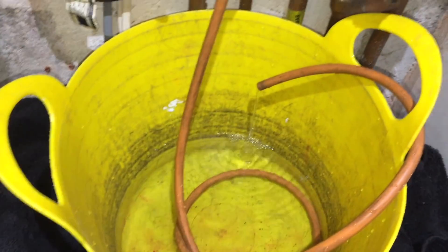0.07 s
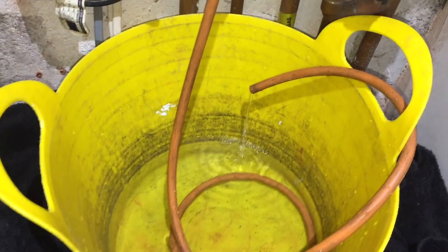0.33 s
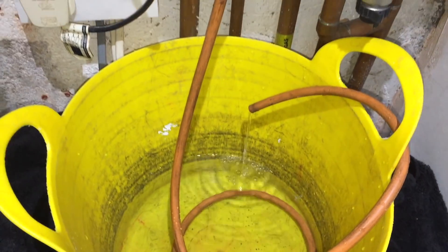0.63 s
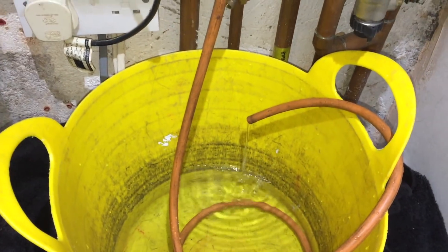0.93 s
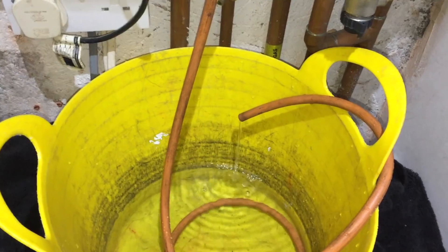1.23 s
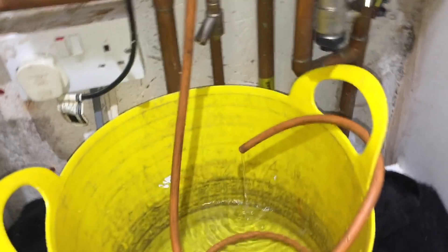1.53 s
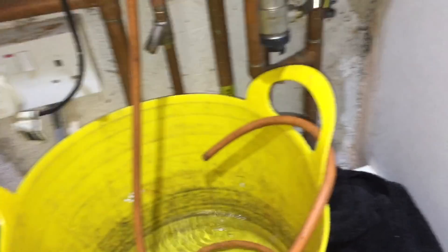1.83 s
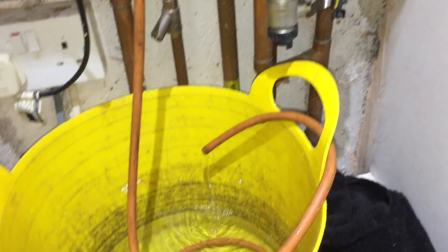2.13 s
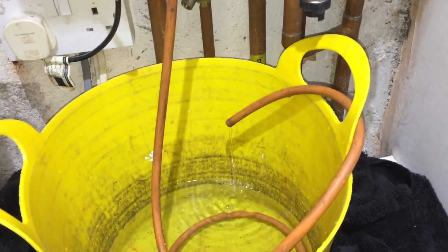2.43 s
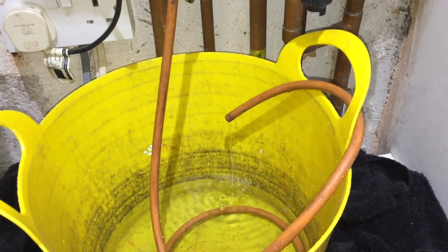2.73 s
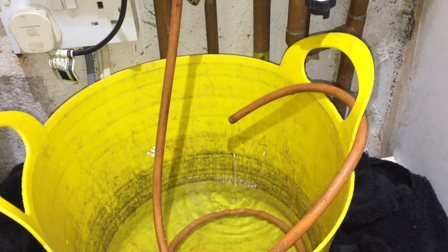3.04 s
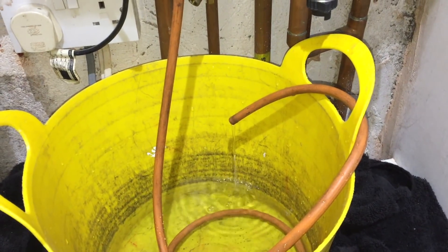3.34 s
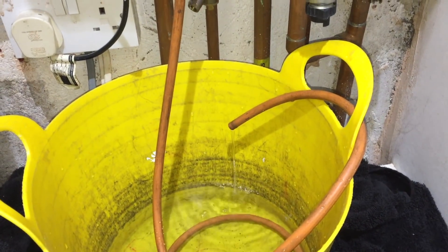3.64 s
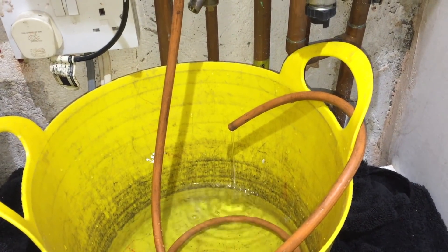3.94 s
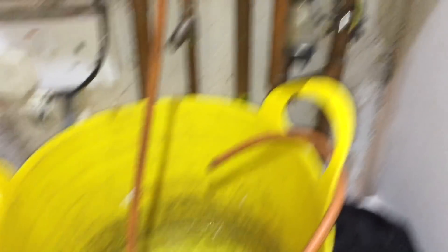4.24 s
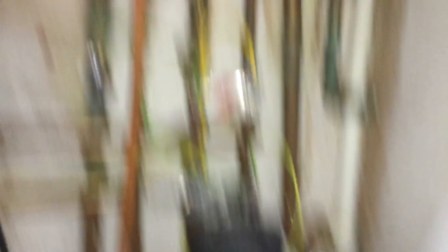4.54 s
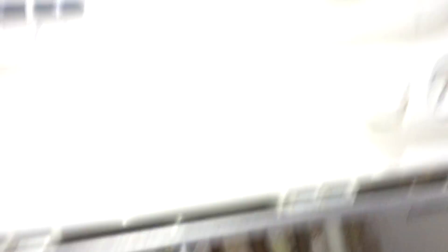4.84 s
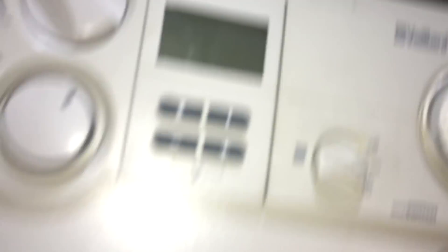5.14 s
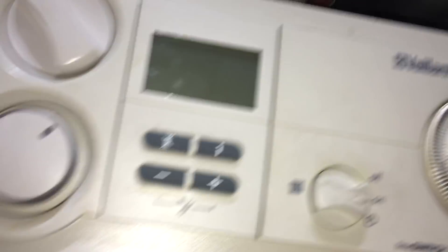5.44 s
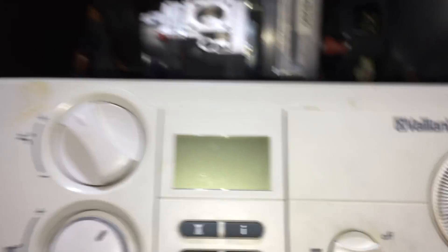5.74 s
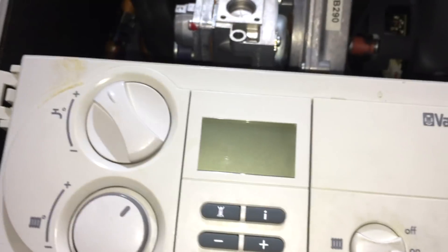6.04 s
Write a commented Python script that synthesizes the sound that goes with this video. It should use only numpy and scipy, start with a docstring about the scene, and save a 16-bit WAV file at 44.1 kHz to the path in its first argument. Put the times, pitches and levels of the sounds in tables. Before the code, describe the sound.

A thin trickle patters into water in a plastic tub, followed by light bumps and a sharp knock on a boiler panel.

```python
"""Drops plink into water in a plastic tub, close to the microphone, as the thin stream from a boiler's
drain hose breaks up. Each drop slaps the surface, punches a hollow that plops and traps ringing bubbles.
The place is a small room with a faint mains hum. The hand-held microphone is lifted away with some
rustling, the trickle fades behind the boiler, and the boiler's plastic control panel is bumped and
then knocks sharply."""
import sys
import numpy as np
from scipy import signal
from scipy.fft import rfft, irfft, next_fast_len
from scipy.io import wavfile
from scipy.ndimage import map_coordinates

SR = 44100
rng = np.random.default_rng(int(sys.argv[2]) if len(sys.argv) > 2 else 0)


def transcribe(signal):
    """Save signal, clipped to [-1, 1], as a 16-bit WAV file at the path in sys.argv[1]."""
    frames = np.atleast_2d(signal).T
    limited = np.clip(frames, -1, 1)
    pcm = np.round(limited * 32767).astype(np.int16)
    wavfile.write(sys.argv[1], SR, pcm)


N = 276948

# Levels in the tables are relative; each source adds its own gain.
# room tone: (frequency [Hz], level [dB])
AIR_SPECTRUM = [(18, -42.5), (30, -12.5), (45, 3), (100, 8), (150, -15), (210, -7), (295, 6), (420, -14.5),
                (520, -12.5), (800, -10), (1400, -17), (3000, -19.5), (6000, -21.5), (16000, -31)]
# partials of the mains hum: (frequency [Hz], level [dB])
HUM_PARTIALS = [(49.6, -65.5), (99.6, -68.5), (300.5, -73.5)]
# reverberation of the small room: (frequency [Hz], t60 [s])
ROOM_DECAY = [(150, 0.42), (1000, 0.24), (3000, 0.2), (8000, 0.18), (15000, 0.087)]
# close reflections, as inside the tub: (frequency [Hz], t60 [s])
TUB_DECAY = [(200, 0.12), (1200, 0.052), (4000, 0.018), (12000, 0.028)]
# faint tones under the trickle: (time [s], pitch [Hz], level [dB])
SOFT_TONES = [(1.555, 676, -59.5), (2.35, 720, -62)]
# a sleeve rubbing at the microphone: (frequency [Hz], level [dB])
SLEEVE_SPECTRUM = [(71, -48), (120, -13.5), (275, -1), (350, -2.5), (961, -8), (1630, -7), (5040, -23),
                   (5800, -15.5), (7860, -44.5), (15000, -29.5)]
# strokes of hand and sleeve: (time [s], length [s], level [dB])
SLEEVE_STROKES = [(0.0, 0.12, -50.5), (2.15, 0.13, -46), (4.785, 0.09, -51.5), (4.91, 0.086, -48.5),
                  (5.29, 0.058, -49), (5.55, 0.13, -56), (5.811, 0.038, -51), (6.09, 0.028, -68)]
# the hand jolts the microphone: (time [s], level [dB])
HAND_JOLTS = [(0.0, -31.5), (0.56, -50), (1.74, -42), (2.18, -44), (2.3, -44), (4.4, -43), (4.68, -51),
              (4.87, -41), (4.98, -44), (5.14, -42), (5.355, -29.5)]
# rumble of a jolt: (frequency [Hz], level [dB])
JOLT_SPECTRUM = [(20, -16), (45, -8.0), (70, 10.0), (120, -7), (220, -26.0), (600, -65.5)]
# small pitched ticks: (time [s], pitch [Hz], level [dB])
PITCHED_TICKS = [(4.622, 2010, -39.5), (4.644, 2980, -26.5), (4.959, 3410, -31.5), (5.013, 2300, -38),
                 (5.213, 3560, -30.5), (5.264, 4630, -35.5), (5.287, 2370, -40), (5.433, 2310, -44),
                 (5.642, 2450, -42.5), (5.667, 5310, -39), (5.697, 5300, -44.5), (5.819, 2450, -37),
                 (5.841, 5810, -38.5), (5.858, 990, -42)]
# blows on the panel and casing: (time [s], crack [dB], body [dB], brightness [dB/octave])
PANEL_KNOCKS = [(4.641, -33.5, -58, -6), (4.751, -42.5, -35, -3), (4.851, -38, -35, -2.5),
                (5.1256, -30.5, -14, -7), (5.143, -22.5, -8.5, -5.5), (5.211, -39.5, -32, -6),
                (5.263, -38, -35.5, 3.5), (5.302, -40, -17.5, -5.5), (5.368, -42.5, -17, -3),
                (5.5076, -4, -0.5, 0), (5.666, -40, -22.5, -11.5), (5.698, -70.5, -24.5, -9),
                (5.841, -42, -37, -7), (6.155, -48, -46.5, -18.5)]
# contact noise on the plastic: (frequency [Hz], level [dB])
CRACK_SPECTRUM = [(120, -25), (200, -4), (400, -7), (800, -4), (1180, -3), (1500, 2.5), (2090, 5.5),
                  (2850, -1), (3900, -1), (5000, -8), (6400, 1), (8250, -9.5), (8900, -6.5), (16000, -11.5)]
# resonances of the panel and casing: (frequency [Hz], level [dB], t60 [s])
PANEL_MODES = [(170.7, -1.5, .24), (208, -3, 0.16), (246, -4.5, 0.25), (326, -1, 0.12), (400, -11.5, 0.14),
               (553, -8, .12), (608, -9.5, 0.086), (675, -11, 0.1), (854, -16.5, 0.12), (1181, -4.5, 0.18),
               (1780, 8, 0.015), (1970, 3.5, 0.025), (2760, 13.5, .04), (3100, 0.5, 0.099),
               (3870, 14, 0.044), (6840, 7.5, 0.025), (7030, -1.5, 0.067), (8230, 18.5, 0.015)]
# response of the tub's side: (frequency [Hz], level [dB])
WALL_SPECTRUM = [(100, -28), (160, -32), (215, -5.5), (300, 19), (420, 11), (560, -11.5), (750, -24),
                 (950, -12.5), (1300, 0.5), (2200, -23.5), (5000, -70)]
# the trickle as heard from the microphone's position: (time [s], minor bubbles [dB], spatter [dB])
TRICKLE_LEVELS = [(0, -57, -53), (.7, -52, -42), (1.498, -54, -45), (2.1, -50, -48), (2.6, -48, -52.5),
                  (3.1, -55, -53.5), (3.8, -62.5, -43.5), (4.4, -47.5, -58), (4.8, -46, -61),
                  (5.3, -52, -60), (5.699, -68.5, -70.5), (6.28, -68.5, -79)]
# a drop's impact on the surface: (frequency [Hz], level [dB])
SLAP_SPECTRUM = [(100, -67), (300, -2.5), (600, -50), (1200, -26.5), (3000, 7), (5000, -4.5), (8000, -6.5),
                 (12000, -8), (16000, -10)]
# collapse of the hollow: (frequency [Hz], level [dB])
PLOP_SPECTRUM = [(120, -48), (220, 9.5), (400, 4), (560, 7), (800, -19.5), (1100, 3.5), (1800, 17),
                 (3000, -6), (6000, -37), (14000, -40)]
# fizz of churned water: (frequency [Hz], level [dB])
FIZZ_SPECTRUM = [(500, -46), (1100, -6), (2000, -16), (3500, 32), (5000, -18), (9000, -39), (16000, -43)]
# drops landing in the tub: (time [s], small bubble [dB], its pitch [Hz],
# large bubble [dB], its pitch [Hz], slap [dB], plop [dB])
DROPS = [(0.0157, -30.5, 2260, -35.5, 1615, -49.5, -68), (0.0356, -38.5, 2530, -46, 1350, -41.5, -57),
         (0.0826, -40, 2270, -38.5, 1640, -74, -51), (0.1241, -35.5, 2340, -39.5, 1380, -62, -54),
         (0.1717, -42, 3360, -41.5, 1710, -61, -62), (0.1983, -31, 7400, -72, 1280, -70, -70),
         (0.225, -38.5, 2370, -45, 1170, -66, -45.5), (0.2476, -30.5, 7030, -46, 867, -73, -59),
         (0.2959, -37, 3130, -38, 1350, -44.5, -65), (0.3511, -31.5, 3140, -38.5, 1300, -53, -47),
         (0.4466, -25, 2500, -44.5, 1660, -32, -54), (0.4782, -19, 3480, -48, 905, -42, -70),
         (0.5348, -35.5, 2300, -40, 1185, -45, -62), (0.6063, -26.5, 6730, -40.5, 1750, -34.5, -46),
         (0.6907, -23.5, 4220, -35, 1127, -27, -45.5), (0.734, -28.5, 5600, -48.5, 939, -63, -70),
         (0.7737, -28, 3470, -56, 2050, -66, -72), (0.7966, -30.5, 5700, -42.5, 1640, -48, -61),
         (0.8216, -30.5, 3410, -68, 1650, -45, -71), (0.8622, -32, 5840, -44, 1490, -66, -65),
         (0.8764, -44, 2330, -35, 1247, -60, -48), (0.9431, -30.5, 6300, -44, 1670, -41.5, -69),
         (0.961, -48, 5650, -38, 1110, -52, -60), (1.0241, -26, 2230, -30.5, 2030, -27.5, -58),
         (1.0434, -31, 2400, -31.5, 1300, -40, -54), (1.1086, -26.5, 3700, -42, 1440, -36, -59),
         (1.123, -35, 3900, -39.5, 1150, -59, -45.5), (1.1898, -30.5, 2370, -44, 2150, -37, -53),
         (1.264, -44, 3160, -38.5, 1250, -38, -47), (1.302, -32.5, 3390, -44.5, 1095, -67, -48.5),
         (1.3859, -36, 3140, -42, 1980, -67, -50), (1.413, -25, 4700, -65, 1180, -72, -70),
         (1.4673, -42, 5650, -44, 1130, -49, -51), (1.4782, -25.5, 4440, -45, 1030, -38, -61),
         (1.4948, -50, 3580, -32.5, 1164, -35.5, -43.5), (1.5407, -35, 3670, -44, 1160, -37.5, -45),
         (1.6029, -33, 4190, -47, 1980, -70, -57), (1.6414, -40, 2080, -44, 1340, -54, -69),
         (1.7147, -51, 7300, -61, 1830, -37.5, -63), (1.721, -32, 5570, -44, 1440, -37, -60),
         (1.7673, -25.5, 3020, -24, 1424, -42, -45), (1.8323, -29.5, 6540, -36.5, 1165, -68, -53.5),
         (1.891, -36, 3750, -64, 1850, -34.5, -50.5), (1.9635, -40, 2860, -41.5, 1166, -50, -64),
         (1.9821, -30, 6900, -41.5, 1100, -35, -49), (2.0213, -42, 2930, -44.5, 1160, -58, -71),
         (2.0449, -57, 3590, -42, 1090, -71, -63), (2.0776, -32.5, 3780, -39.5, 1230, -66, -59),
         (2.1019, -40, 2730, -45, 1130, -43, -62), (2.2359, -32, 2930, -39.5, 1530, -46, -43),
         (2.3421, -33, 2920, -44.5, 1260, -74, -72), (2.3758, -35, 2310, -38.5, 1640, -66, -71),
         (2.4092, -34, 3200, -35.5, 1380, -66, -58), (2.4799, -29, 3080, -45, 1290, -50, -48),
         (2.5602, -31, 3920, -48, 1130, -48, -49), (2.5741, -43, 2360, -38.5, 1046, -50, -47),
         (2.5956, -31, 6200, -52, 1070, -35.5, -67), (2.6255, -33, 2830, -45, 1630, -36, -72),
         (2.661, -28, 3080, -54.5, 1150, -54, -67), (2.6846, -52, 3260, -39, 1390, -50.5, -67),
         (2.7238, -27.5, 2930, -36, 1300, -58, -68), (2.7476, -35, 2740, -38, 1605, -59, -69),
         (2.7765, -24, 2840, -34.5, 2113, -37, -48), (2.8062, -29.5, 4070, -41, 1200, -46, -64),
         (2.835, -28, 3050, -67, 1220, -39, -66), (2.8645, -32.5, 6140, -36.5, 1115, -41.5, -41.5),
         (2.9316, -40, 2740, -45.5, 1660, -39, -71), (2.9917, -30, 2410, -37.5, 1640, -42, -57),
         (3.0066, -37.5, 2500, -37.5, 1400, -65, -62), (3.0599, -17.5, 3680, -55, 1390, -50, -72),
         (3.1133, -34, 6200, -72, 1430, -42, -60), (3.1674, -29, 3050, -45, 2210, -33.5, -66),
         (3.1891, -28, 4070, -52, 1800, -71, -69), (3.2095, -36.5, 4790, -69, 1910, -48, -79),
         (3.2623, -59, 2770, -43.5, 1010, -68, -45.5), (3.3351, -36.5, 2830, -35.5, 1200, -55, -46),
         (3.3595, -15.5, 3310, -38.5, 1220, -33.5, -69), (3.3888, -20.5, 3030, -30.5, 1510, -35, -67),
         (3.4433, -48, 3590, -42, 1610, -63, -52), (3.4658, -37.5, 5900, -29, 1420, -72, -65),
         (3.5365, -35, 2890, -42, 1306, -47, -54), (3.5924, -40, 8300, -42.5, 1660, -57, -62),
         (3.62, -42, 2390, -39, 1410, -67, -71), (3.638, -30.5, 2410, -44, 1450, -64, -82),
         (3.7174, -50, 2800, -38, 1450, -47, -66), (3.8042, -36, 5760, -59, 958, -66, -74),
         (3.866, -40, 2780, -45.5, 1690, -55, -56), (3.8896, -19.5, 2950, -28, 2300, -31.5, -64),
         (3.924, -29, 3850, -47, 1620, -52, -71), (3.9904, -41.5, 7260, -38.5, 1165, -46.5, -53),
         (4.0491, -50, 4500, -41.5, 1300, -71, -48), (4.0712, -34.5, 2780, -49, 1590, -77, -56),
         (4.142, -49, 2680, -41.5, 1180, -61, -54), (4.2256, -37, 3510, -39, 1520, -35.5, -55),
         (4.3024, -18.5, 3270, -50, 1400, -73, -72), (4.3268, -25, 3130, -46, 1430, -81, -67),
         (4.34, -32, 3260, -34.5, 1300, -75, -56), (4.4224, -37, 2860, -35.5, 1146, -78, -50),
         (4.4464, -28, 3120, -48, 1060, -60, -70), (4.4627, -40, 2680, -33, 1310, -52, -66),
         (4.5293, -36, 3270, -62, 1670, -69, -78), (4.5988, -38, 2450, -59, 1600, -54, -74)]

SMALL_DB, LARGE_DB, SLAP_DB, PLOP_DB = -1.5, 5.5, 11, 7.5  # gain of each part of a drop
SMALL_CYCLES, LARGE_CYCLES = 9.2, 8.9  # nominal life of its bubbles
SMALL_RISE, LARGE_RISE, RISE_SCATTER = .15, .077, .32  # share they climb in pitch, and its spread
PINCH_DB, PINCH_T60_S = -14.5, .014  # crackle as a bubble pinches off
SHED_DB, SHED_S, SHED_RATIO = -12, .011, 1.17  # shed bubble: level, typical delay and pitch ratio


def amp(db):
    """Decibels to amplitude."""
    return 10 ** (np.asarray(db) / 20)


def unit(x):
    """x scaled to rms 1."""
    return x / np.sqrt(np.mean(x ** 2) + 1e-20)


def along(points, hz):
    """Interpolate (frequency, value) points on a log axis."""
    freqs, values = np.transpose(points)
    return np.interp(np.log(hz + 1), np.log(freqs + 1), values)


def wobble(rate):
    """A smooth random curve, rate knots a second."""
    coarse = np.arange(0, N + 32, 32)
    knots = rng.standard_normal(int(N * rate / SR) + 4)
    return np.interp(np.arange(N), coarse, map_coordinates(knots, [coarse * rate / SR]))


def filtered(x, response):
    """x through a frequency response."""
    size = next_fast_len(len(x) + min(len(x), 8192))
    return irfft(rfft(x, size) * response(np.fft.rfftfreq(size, 1 / SR)), size)[:len(x)]


def noise(spectrum, size, tilt_db=0):
    """Coloured noise of rms 1, tilted by tilt_db per octave above 1 kHz."""
    def response(hz):
        return amp(along(spectrum, hz) + tilt_db * np.log2(np.maximum(hz, 1000) / 3000))
    return unit(filtered(rng.standard_normal(size), response))


def add(track, s, sound):
    """Mix a sound into the track at time s."""
    start = int(np.clip(round(s * SR), 0, N))
    track[start:start + len(sound)] += sound[:N - start]


def burst(t, db, rise_s, t60_s):
    """An envelope that rises quickly and dies away exponentially."""
    return amp(db - 60 * t / t60_s) * (1 - np.exp(-t / rise_s))


def ping(hz, cycles, rise):
    """A bubble or tick rings for milliseconds, dying ever faster; its pitch climbs by the share rise."""
    life = .004 * np.tanh(cycles / hz / .004)
    t = np.arange(int(4 * life * SR)) / SR
    age = t / life
    phase = 2 * np.pi * np.cumsum(hz * (1 + rise * np.tanh(age / 1.5))) / SR
    fade = np.exp(-age / 2 - (age / 1.7) ** 2)
    return np.sin(phase) * fade * (1 - np.exp(-t * hz))


def room_tone():
    """Still room air and a faint, slightly unsteady mains hum."""
    t = np.arange(N) / SR
    hum = sum(np.sqrt(2) * amp(db + wobble(1.4)) * np.sin(2 * np.pi * hz * t + .16 * wobble(.67))
              for hz, db in HUM_PARTIALS)
    return hum + amp(-66.5) * noise(AIR_SPECTRUM, N)


def tail(decays, size):
    """A diffuse echo of energy 1 in which each frequency dies at its own speed."""
    hz, t, spectrum = signal.stft(rng.standard_normal(size), SR, nperseg=256)
    echo = signal.istft(spectrum * amp(-60 * t / along(decays, hz)[:, None]), SR, nperseg=256)[1]
    echo *= 1 - np.exp(-np.arange(len(echo)) / SR / .0011)
    return echo / np.linalg.norm(echo)


def echoes(x, decays, delay_s, size, stretches):
    """Reflections change as the microphone moves: each stretch of time gets a new tail."""
    out = np.zeros(N)
    for part in np.array_split(np.arange(N), stretches):
        add(out, part[0] / SR + delay_s, signal.fftconvolve(x[part], tail(decays, size)))
    return out


def soft_tones():
    """Two faint tones swell and fade in the background."""
    out, t = np.zeros(N), np.arange(SR // 3) / SR
    age = t / .038
    for s, hz, db in SOFT_TONES:
        add(out, s, amp(db) * age * np.exp(1 - age) * np.sin(2 * np.pi * hz * t))
    return out


def sleeve_rustle(count=260, grip_db=-70, attack_s=.015, release_s=.025):
    """Right at the microphone, a sleeve rubs in quick slips; some catch with a small tick."""
    slips = unit(amp(2.8 * wobble(240)) * noise(SLEEVE_SPECTRUM, N))
    catches = np.zeros(N)
    for (when, pitch), size in zip(rng.random((count, 2)), rng.standard_normal(count)):
        add(catches, when * N / SR, amp(3 * size) * ping(1000 * 5 ** pitch, cycles=8, rise=0))
    pressure, t = np.full(N, amp(grip_db)), np.arange(SR) / SR
    for s, length, db in SLEEVE_STROKES:
        release = np.exp(-np.maximum(t - length, 0) / release_s)
        add(pressure, s, amp(db) * np.minimum(t / attack_s, 1) * release)
    return pressure * (amp(-6.5) * slips + amp(-13.5) * unit(catches))


def hand_jolts():
    """Each jolt of the hand reaches the microphone as a low rumble."""
    shake, t = np.zeros(N), np.arange(SR) / SR
    for s, db in HAND_JOLTS:
        add(shake, s, burst(t, db, rise_s=.007, t60_s=.3))
    return amp(-10.5) * shake * noise(JOLT_SPECTRUM, N)


def pitched_ticks():
    """Small pitched ticks, probably far drips behind the boiler, ring briefly with short reflections."""
    out = np.zeros(N)
    for s, hz, db in PITCHED_TICKS:
        add(out, s, amp(db - 3.5) * ping(hz, cycles=5.4, rise=0))
    return out + amp(-1.5) * echoes(out, TUB_DECAY, delay_s=.0027, size=8192, stretches=8)


def panel_knocks():
    """A blow cracks on the boiler's plastic panel and rings the casing."""
    out, t = np.zeros(N), np.arange(SR // 2) / SR
    contact = amp(-9.5 - 60 * np.maximum(t - .002, 0) / .033) + amp(-18.5 - 60 * t / .098)
    contact *= 1 - np.exp(-(t / .0011) ** 2)
    for s, crack_db, body_db, tilt_db in PANEL_KNOCKS:
        crack = contact * noise(CRACK_SPECTRUM, len(t), tilt_db)
        ring = np.zeros(len(t))
        for hz, db, t60 in PANEL_MODES:
            blow_db = body_db if hz < 1000 else crack_db + tilt_db * np.log2(hz / 2000)
            onset = 1 - np.exp(-(t / max(1 / hz, .0012)) ** 2)
            swing = onset * np.sin(2 * np.pi * (hz * t + rng.random()))
            ring += amp(blow_db + db + rng.normal() - 60 * t / t60) * swing
        add(out, s, amp(crack_db) * crack + amp(-26) * ring)
    return out


def tub_wall(water, smoothing_s=.012):
    """The splashes nudge the soft plastic wall, which answers with a dull patter."""
    push = signal.lfilter([1], [1, -np.exp(-1 / (smoothing_s * SR))], np.abs(water))
    return amp(-66.5) * unit(push ** .7) * noise(WALL_SPECTRUM, N)


def spatter(count=210):
    """Stray droplets tick faintly on the water, each around a high pitch of its own."""
    out, t = np.zeros(N), np.arange(SR // 100) / SR
    times, _, level_db = np.transpose(TRICKLE_LEVELS)
    for (when, pitch), size in zip(rng.random((count, 2)), np.clip(rng.standard_normal(count), -2, 2)):
        s, hz = when * DROPS[-1][0], 5500 * 2.4 ** pitch
        tick = unit(filtered(noise(SLAP_SPECTRUM, len(t)), lambda f: 1 / np.hypot(1, (f - hz) / 1200)))
        db = np.interp(s, times, level_db) - 4.3 + 5.4 * size
        add(out, s, amp(db - 60 * t / .012) * tick)
    return out


def minor_bubbles(count=1100, wake_share=.65, mean_lag_s=.022):
    """Faint bubbles ring after the drops or at any time, fading as the microphone leaves the tub."""
    out = np.zeros(N)
    times, level_db, _ = np.transpose(TRICKLE_LEVELS)
    chances, spreads = rng.random((count, 4)), np.clip(rng.standard_normal((count, 2)), -2, 2)
    for (pick, kind, lag, pitch), (size, life) in zip(chances, spreads):
        if kind < wake_share:
            s = DROPS[int(pick * len(DROPS))][0] - mean_lag_s * np.log(1 - lag)
        else:
            s = pick * (N - 1) / SR
        hz = 1050 * 4.1 ** pitch
        cycles = 10.5 * np.sqrt(hz / 2000) * np.exp(.58 * life)
        db = np.interp(s, times, level_db) - 1 + 3 * size
        add(out, s, amp(db) * ping(hz, cycles, rise=.087))
    return out


def plops(collapse_lag_s=.002996):
    """A drop's hollow collapses with a short, dull splash, and the churned water fizzes for a moment."""
    out, t = np.zeros(N), np.arange(SR // 12) / SR
    fizz = burst(t, -23.5, rise_s=.0029, t60_s=.022)
    for s, small_db, _, large_db, _, _, db in DROPS:
        collapse = burst(t, db + PLOP_DB, rise_s=.0025, t60_s=.038)
        add(out, s + collapse_lag_s, collapse * noise(PLOP_SPECTRUM, len(t)))
        churn = amp(small_db + SMALL_DB) + amp(large_db + LARGE_DB)
        add(out, s, churn * fizz * noise(FIZZ_SPECTRUM, len(t)))
    return out


def slaps(colour_spread_db=9.5):
    """Each drop hits the water with a tiny broad tick; no two have quite the same colour."""
    out, t = np.zeros(N), np.arange(SR // 50) / SR
    shape = burst(t, 0, rise_s=.0004, t60_s=.0028) + burst(t, -12, rise_s=.0004, t60_s=.03)
    bands = np.geomspace(1000, 16000, 14)
    for s, *_, db, _ in DROPS:
        colour = np.column_stack([bands, colour_spread_db * rng.standard_normal(len(bands))])
        hiss = unit(filtered(noise(SLAP_SPECTRUM, len(t)), lambda hz: amp(along(colour, hz))))
        add(out, s, amp(db + SLAP_DB) * shape * hiss)
    return out


def crackle(hz, size):
    """Pinching off, a bubble makes a broad band of noise around its pitch."""
    def band(f):
        return f * hz / (f * f + hz * hz) * (f > 500) / (1 + (f / 7000) ** 2)
    return unit(filtered(rng.standard_normal(size), band))


def plinks():
    """A drop's two bubbles pinch off, climb in pitch as they near the surface and each shed another."""
    out, t = np.zeros(N), np.arange(SR // 40) / SR
    spreads = rng.standard_normal((len(DROPS), 2, 3))
    for (s, small_db, small_hz, large_db, large_hz, *_), spread in zip(DROPS, spreads):
        small = small_hz, small_db + SMALL_DB, SMALL_CYCLES, SMALL_RISE
        large = large_hz, large_db + LARGE_DB, LARGE_CYCLES, LARGE_RISE
        for (hz, db, cycles, rise), (climb, lag, detune) in zip((small, large), spread):
            rise *= np.exp(RISE_SCATTER * climb)
            add(out, s, amp(db) * ping(hz / (1 + rise / 2), cycles, rise))  # passes hz in mid-climb
            pinch = burst(t, db + PINCH_DB, rise_s=.0036, t60_s=PINCH_T60_S)
            add(out, s, pinch * crackle(hz, len(t)))
            shed = ping(hz * SHED_RATIO * np.exp(.14 * detune), cycles, rise)
            add(out, s + SHED_S * np.exp(.45 * lag), amp(db + SHED_DB) * shed)
    return out


def scene():
    """At the microphone: water echoing in the tub, the boiler's knocks, handling and a little room."""
    water = amp(-.7) * plinks() + minor_bubbles() + slaps() + spatter() + plops()
    tub_echo = echoes(water, TUB_DECAY, delay_s=.0032, size=8192, stretches=32)
    tub = water + amp(-8.5) * tub_echo + tub_wall(water)
    knocks, ticks = panel_knocks(), pitched_ticks()
    into_room = amp(-19) * tub + amp(-18) * knocks + amp(-13.5) * ticks
    room_echo = echoes(into_room, ROOM_DECAY, delay_s=.008, size=24576, stretches=12)
    handling = sleeve_rustle() + hand_jolts()
    return tub + soft_tones() + knocks + ticks + room_echo + handling + room_tone()


def record(dry):
    """One microphone, mono: the loudest peaks are rounded off and the top treble is cut steeply."""
    ceiling, top_hz = .58, 16100
    rounded = dry / (1 + np.abs(dry / ceiling) ** 4) ** .25
    return filtered(rounded, lambda hz: 1 / np.sqrt(1 + (hz / top_hz) ** 160))[None]


dry = scene()
out = record(dry)
transcribe(out)
```